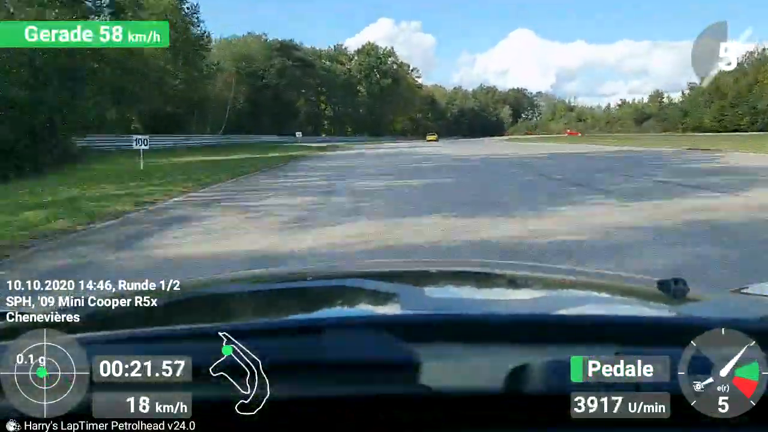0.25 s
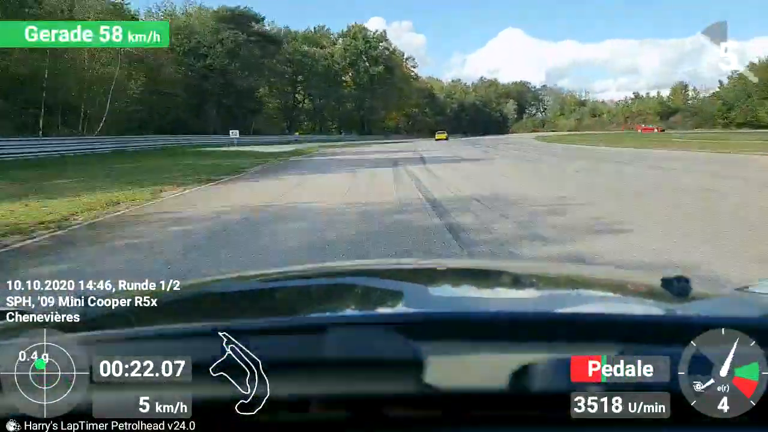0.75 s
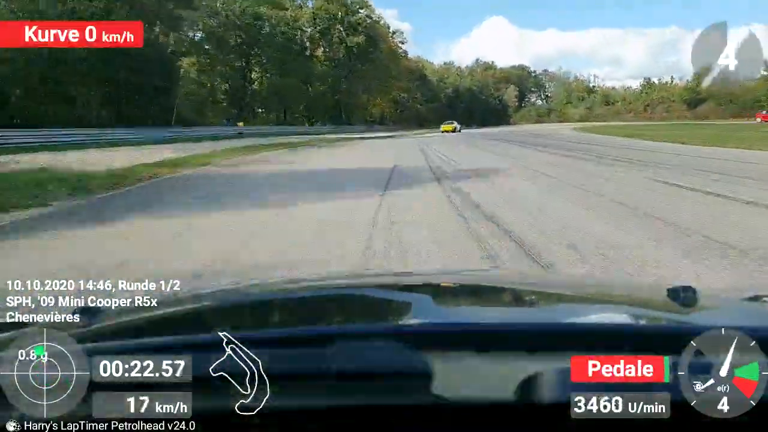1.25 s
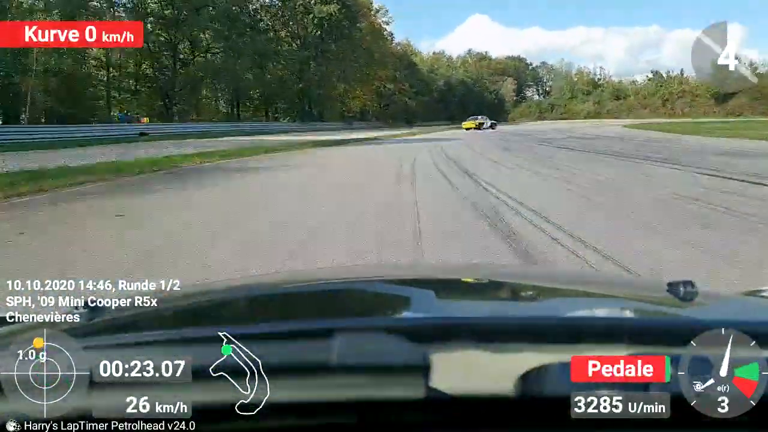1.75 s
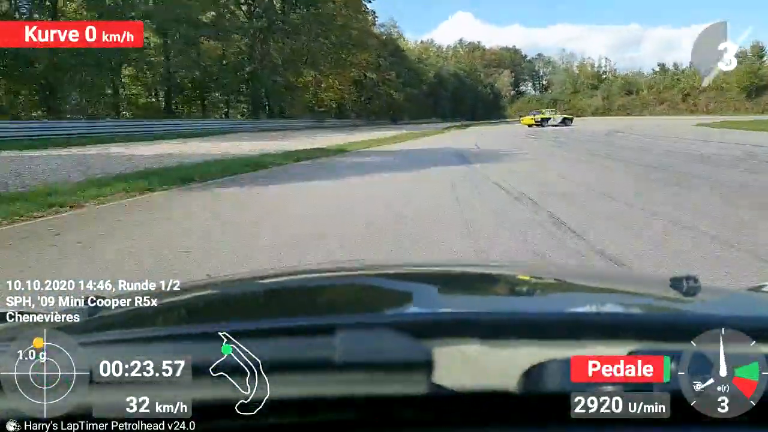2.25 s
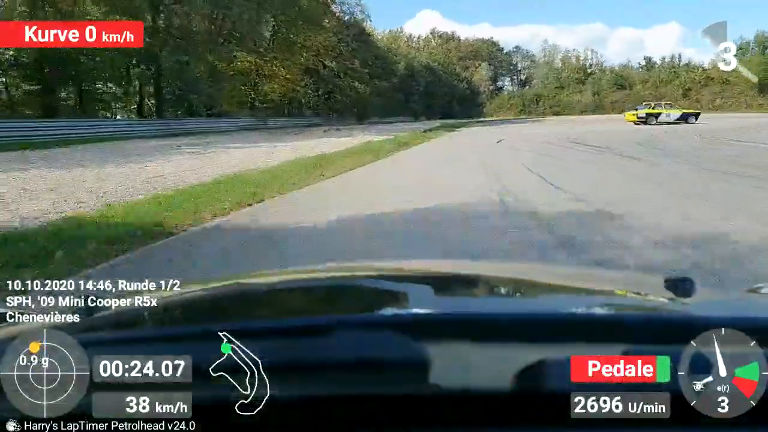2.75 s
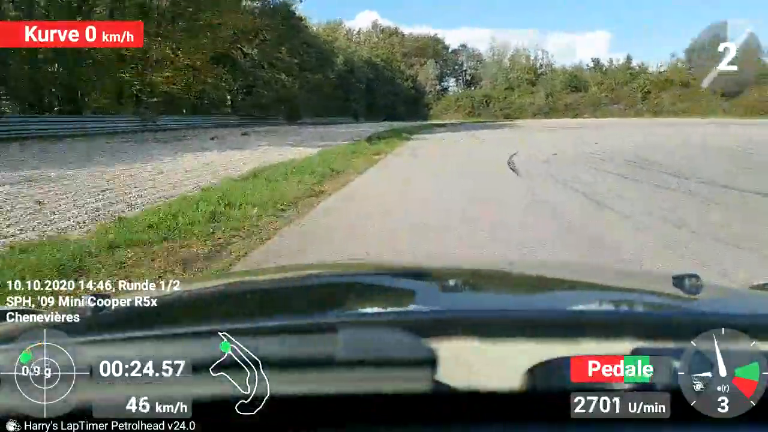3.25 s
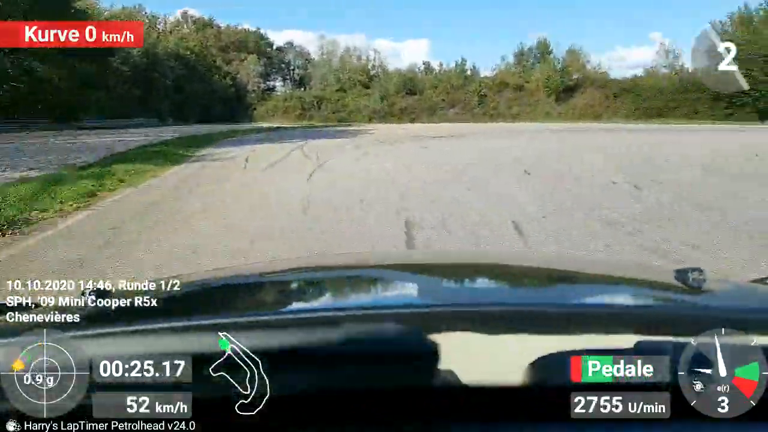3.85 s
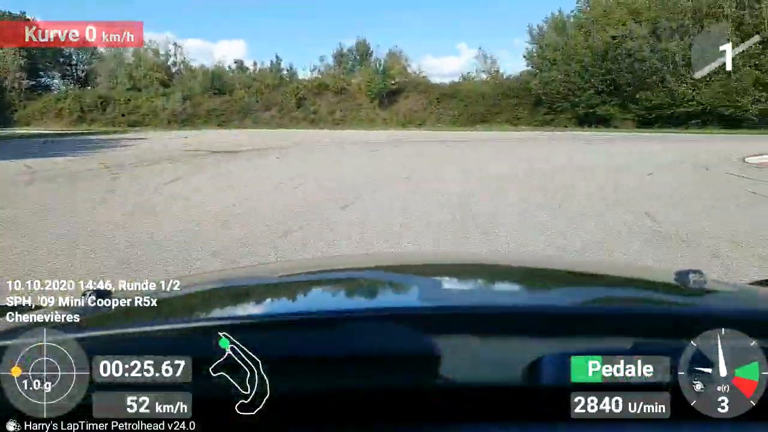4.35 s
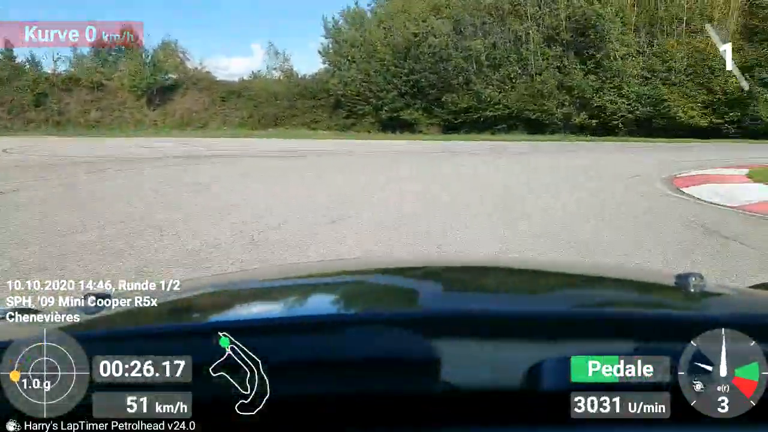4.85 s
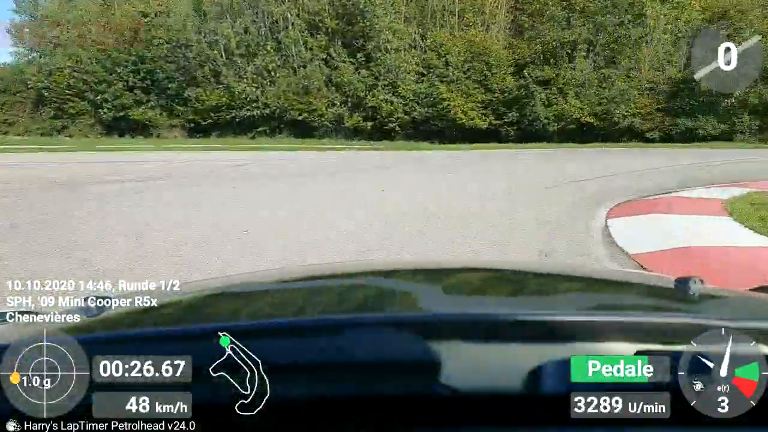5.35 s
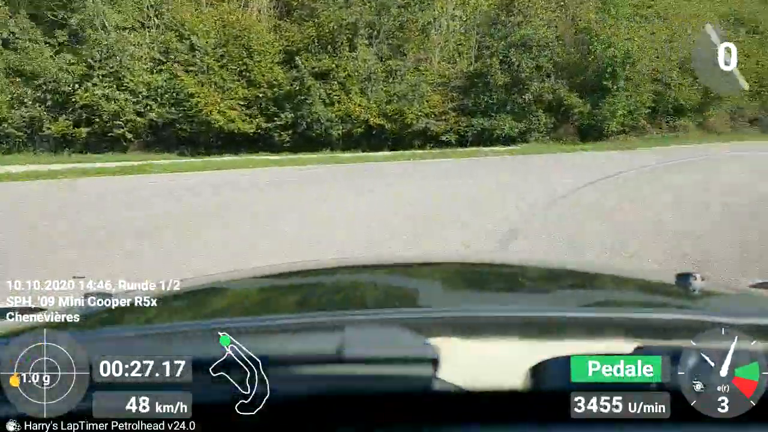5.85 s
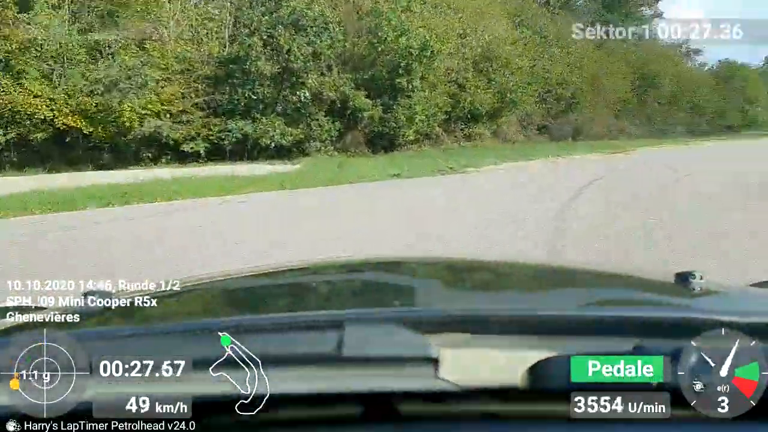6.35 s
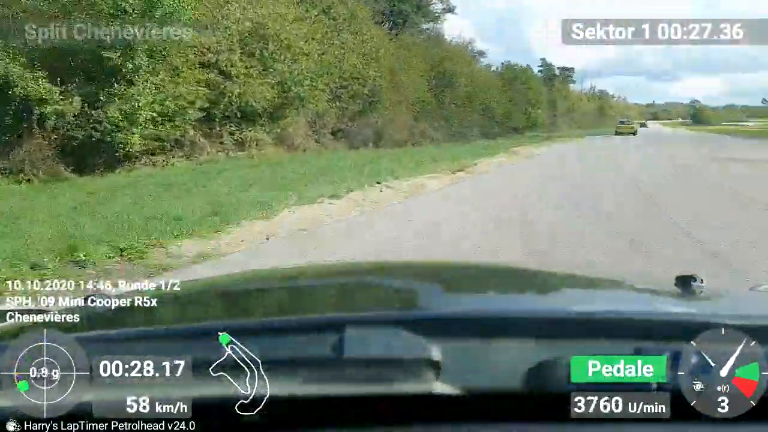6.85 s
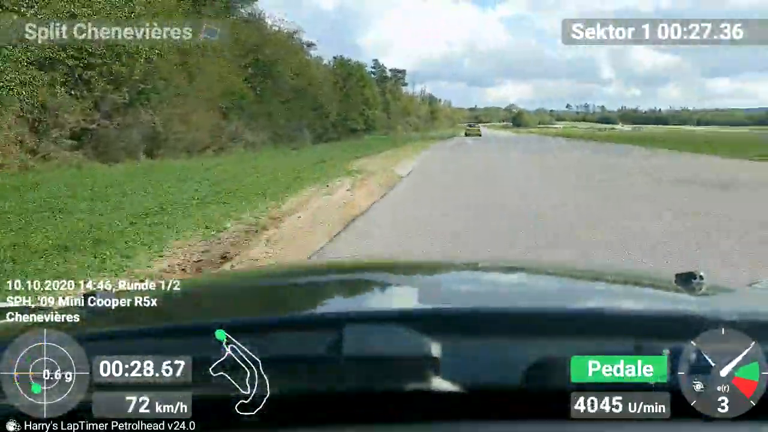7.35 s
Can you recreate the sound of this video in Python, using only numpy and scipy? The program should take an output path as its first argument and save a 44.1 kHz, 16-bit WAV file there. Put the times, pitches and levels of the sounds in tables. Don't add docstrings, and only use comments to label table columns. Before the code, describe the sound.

Heard from the windscreen inside a four-cylinder car on a circuit: a loud, buzzing full-throttle boom for almost a second, then a sudden lift. Pedals and gear lever clack close by, the engine flares briefly and falls in pitch while the floor booms under braking. Bumps thud and tyres roar through the corner at a low drone, then the engine swells and pulls away, deep and rough.

```python
import sys
import numpy as np
from scipy import signal
from scipy.fft import rfft, irfft, next_fast_len
from scipy.io import wavfile
from scipy.ndimage import uniform_filter1d, map_coordinates

SR = 44100
rng = np.random.default_rng(int(sys.argv[2]) if len(sys.argv) > 2 else 0)


def master_out(mix):
    frames = np.transpose(np.atleast_2d(mix))
    ceiling = np.clip(frames, -1, 1)
    pcm = np.round(ceiling * 32767).astype(np.int16)
    wavfile.write(sys.argv[1], SR, pcm)


def volts_from_db(level):
    exponent = np.asarray(level, float) / 20
    return 10 ** exponent


N = 335160

# (time [s], firing tone [dB], throttle [0-1])
EFFORT = [(0, -9.5, 0.97), (.8, -8.5, 0.97), (.9, -25.5, 0.62), (1.85, -24.5, 0.54), (1.97, -16.5, 0),
          (2.45, -10.5, .05), (3.2, -12, 0), (3.6, -11.5, 0.2), (4.12, -19.5, 0.08), (4.22, -17.5, 0.66),
          (4.42, -15, 0.67), (4.52, -9, 0.98), (4.66, -11.5, 0.7), (4.75, -21.5, 0.48), (5.2, -21, 0.44),
          (5.3, -16.5, 0.6), (5.8, -10, 0.97), (7.6, -8.5, 1)]
# (frequency [Hz], level [dB])
EXHAUST = [(185, -13.5), (290, -21.5), (320, -25), (355, -24), (400, -30), (530, -49.5), (700, -44),
           (950, -73.5)]
# (firing rate [Hz], level [dB])
LOPE = [(90, -18), (99, -27), (109, -16.5), (117, -10.5), (160, -5)]
# (frequency [Hz], level [dB])
CABIN = [(50, -25.5), (120, -22.5), (200, -25), (245, -33.5), (280, -22), (340, -39.5), (400, -25),
         (440, -30), (500, -44), (560, -27.5), (610, -39.5), (680, -45), (800, -58.5), (1100, -70)]
# (multiple of the firing rate, level over the quarter orders [dB])
UPPER_MULTIPLES = [(5, 8.5), (7, 8.5)]


def engine():
    speed_change, jolt_db = lurches()
    hz = firing_rate() * (1 + speed_change)
    tone_db, throttle = curves(EFFORT)
    throttle = np.clip(throttle, 0, 1)

    def multiple_db(k):
        shut_db = -14.5 - 6.5 * k
        return shut_db * (1 - throttle) + 0.98 * throttle * jolt_db + along(EXHAUST, k * hz)

    lope_shut_db = -32
    lope_open = throttle ** 3.7
    lope_db = lope_shut_db + lope_open * (along(LOPE, hz) - lope_shut_db)
    phase = 2 * np.pi * np.cumsum(hz * (1 + .002 * wobble(25))) / SR
    slip = np.clip(hz - 100, -10, 20)
    # (multiple, level [dB], lag [rad], unsteadiness [dB])
    lines = [(1, tone_db + jolt_db, 0, .6),
             (2, multiple_db(2), -.06 * slip, 1),
             (3, multiple_db(3), -2.3 - .05 * slip, 1.3),
             (4, multiple_db(4), 0.58, 2.1),
             (6, multiple_db(6), 2.7, .7)]
    for k, over_db in UPPER_MULTIPLES:
        lines.append((k, lope_db + over_db + along(CABIN, k * hz), k, 1.1))
    for k in range(2, 24):
        if k % 4:
            lines.append((k / 4, lope_db + along(CABIN, k / 4 * hz), k * k, 1.5))
    out = np.zeros((2, N))
    for k, level_db, lag, shake_db in lines:
        across = np.minimum(1.7 * (k * hz / 580) ** 3, 1.3) * np.array([[.5], [-.5]])
        drift = .05 * k * wobble(4)
        level = np.sqrt(2) * volts_from_db(level_db + shake_db * wobble(30))
        out -= level * np.cos(k * phase - lag - across + drift)
    return out


# (time [s], firing rate [Hz])
SPEED = [(0, 159), (.7, 160.5), (1.2, 149.3), (1.36, 166), (1.64, 147.5), (1.87, 125.2), (2.5, 99.5),
         (2.92, 124.2), (3.37, 89.62), (4.1, 88.48), (4.3, 92.26), (5.08, 86.7), (5.7, 92.14), (6.2, 97.26),
         (6.61, 99.5), (7.0, 117), (7.35, 116.4), (7.6, 124)]


def firing_rate():
    flywheel_s = .05
    return uniform_filter1d(curves(SPEED)[0], size=round(flywheel_s * SR), mode="nearest")


# (time [s], speed change [%], tone change [dB], length [s])
LURCHES = [(0.722, -0.58, 1.5, 0.054), (0.974, 0.32, 11.5, 0.026), (1.05, -0.35, -13, .025),
           (1.113, -0.01, 8.5, .035), (1.241, 0.01, -26, 0.022), (1.334, -0.12, 6, .03),
           (1.421, 0.5, -1, .03), (1.56, 0.01, 8, .07), (2.99, 0.22, -1.5, .08), (3.145, -0.18, 1.8, .06),
           (3.393, 0.09, -4, .08), (3.6, 5, 0, .09), (3.744, -1.17, -8.5, .03), (3.832, 0.84, 3.5, 0.056),
           (4.146, 1, -3.5, .025), (4.984, -0.1, 4.5, .06), (5.158, -0.81, -4.5, 0.072),
           (5.411, 0.25, -1.5, 0.034), (5.525, -0.43, -4.5, .025), (5.63, 0.48, -1.5, 0.029),
           (5.734, -0.56, -3.5, 0.022), (5.828, 6.5, 1.9, .05), (5.927, -0.02, -0.5, 0.018),
           (5.952, 5, 3.5, 0.02), (6.04, -5.5, -3.1, .035), (6.139, 1.26, .9, .03),
           (6.651, -0.93, -3.5, .17), (6.83, 4, -1.5, 0.038), (6.898, -3.5, -2, .04)]


def lurches():
    s, percent, db, length = np.transpose(LURCHES)
    return swells(s, percent / 100, length), swells(s, db, length)


# (time [s], peak [dB], mid
# clack [dB], low knock [dB], ping [Hz])
CLUNKS = [(0.0932, -42, -8, -1, 1210), (0.217, -44.5, -7.5, -1, 1100), (0.2729, -55, 0, 0.5, 1010),
          (0.335, -54.5, 14, 1, 1120), (0.383, -56.5, 10, 3, 1040), (0.6049, -51.5, 8, 7, 1120),
          (0.9312, -50, 7, 13, 1080), (0.964, -30.5, 10.5, -10.5, 1150), (1.0235, -49, -6, 2, 1600),
          (1.091, -36.5, -1.5, 9, 1300), (1.1474, -37, 3.5, -3, 1270), (1.1957, -44, 13, -0.5, 1150),
          (1.282, -30.5, 11.5, 7.5, 2117),
    (1.3745, -43, 0.5, 4, 3400),
    (2.0974, -36.5, -13.5, -3.5, 5500),
    (3.617, -46, 7, -6.5, 4290),
    (3.914, -51, -2.5, 6, 2370),
    (4.409, -49, -4, 4, 2280),
    (5.2088, -45.5, 11, -8.5, 3480),
    (5.5511, -52, -4, 2, 2176),
    (5.7684, -53, 9, 10.5, 1960),
    (5.84, -48.5, 5.5, -4, 2050),
]
# (frequency [Hz], level [dB per Hz])
TICK = [(1470, -31.5), (2500, -3.5), (3100, -7), (6840, -12), (7500, -18), (8540, -14), (15700, -16.5)]
# (frequency [Hz], level [dB per Hz])
CLACK = [(470, -35), (800, -3.5), (1110, -2), (1960, -10.5), (2150, -3.5), (2420, -12.5), (3480, -7.5),
         (4060, -14.5), (7000, -26.5), (9100, -54), (15400, -120)]
# (frequency [Hz], width [Hz])
KNOCK = (570, 150)


def clunks():
    tick = rush(colour(TICK), patchy_db=3.0)
    clack = rush(colour(CLACK), patchy_db=0.9)
    knock = rush(hollow(*KNOCK), patchy_db=1.5)
    out, t = np.zeros((2, N)), np.arange(SR // 4) / SR
    contacts = CLUNKS
    chance = rng.uniform(0, 2 * np.pi, (len(contacts), 2))
    for (s, db, clack_db, knock_db, ping_hz), phase in zip(contacts, chance):
        at = round(s * SR) - 90
        pan_db = -4 if db > -44.5 else 0.5
        cluster = 0
        for k in (.93, 1, 1, 1.09):
            cluster = cluster + np.sin(2 * np.pi * ping_hz * k * t + k * 9 * phase[0] + .2 * phase[:, None])
        ping = volts_from_db(-3 - .4 * clack_db - 60 * t / .06) * cluster
        thump = np.sin(2 * np.pi * 520 * t + 0.57 * phase[:, None])
        thump = volts_from_db(knock_db + 3.5 - 60 * t / 0.065) * thump
        hit = volts_from_db(clack_db) * (1 - np.exp(-t / .005)) * (ping + thump)
        # (noise, level [dB], rise [s], time to fall 60 dB [s])
        parts = [(tick, 0, .0009, .04), (clack, clack_db, .007, .13), (knock, clack_db + knock_db, .005, .12)]
        for noise, rel_db, rise, t60 in parts:
            shape = (1 - np.exp(-t / rise)) * volts_from_db(-250 * t - 60 * np.maximum(t - .018, 0) / t60)
            grain = noise[:, at:at + len(t)] / np.std(noise[:, at:at + SR // 40])
            hit = hit + volts_from_db(rel_db) * shape * grain
        out[:, at:at + len(t)] += volts_from_db(db - 3.0 + pan_db * np.array([[.5], [-.5]])) * hit
    return out


def road():
    bump_db, boom_db, hiss_db = bumps(), braking(), air()
    judder_db = judder()
    body = thud(bump_db) + rumble(bump_db, boom_db) + boom(boom_db)
    return body + roar(hiss_db, judder_db) + hiss(hiss_db, judder_db)


SMOOTH_DB = -32.5
# (time [s], thud [dB], length [s])
BUMPS = [(0.123, -31, .1), (0.676, -34.5, 0.029), (0.964, -21, .05), (1.144, -15.5, 0.062),
         (1.417, -23, 0.15), (1.694, -21.5, 0.048), (1.98, -31, .17), (2.262, -22, 0.15),
         (2.467, -24.5, .1), (2.693, -17.5, .05), (2.906, -27.5, 0.092), (3.19, -19, .1), (3.468, -20, .07),
         (3.8, -25.5, 0.25), (4.028, -29, 0.16), (4.461, -20, 0.14), (4.63, -24, 0.12), (5.003, -16, 0.051),
         (5.304, -20, .08), (5.625, -20.5, 0.19), (5.885, -16.5, .09), (6.476, -26, 0.11),
         (6.734, -23, 0.046), (6.91, -20, .06), (7.286, -23, 0.066), (7.516, -27, 0.11)]


def bumps():
    s, db, length = np.transpose(BUMPS)
    return 20 * np.log10(volts_from_db(SMOOTH_DB) + swells(s, volts_from_db(db), length))


# (frequency [Hz], level [dB per Hz])
THUD = [(12, -49.5), (25, -28.5), (40, -16), (52, -14), (66, -2), (78, -9.5), (110, -24.5), (220, -120)]


def thud(bump_db):
    sway = rush(colour(THUD), patchy_db=0.0)
    sway = sway / (.15 + np.abs(uniform_filter1d(sway[0] ** 2, size=3000))) ** .4
    return volts_from_db(bump_db - 3.5) * unit(sway)


# (frequency [Hz], level [dB per Hz])
RUMBLE = [(35, -39), (70, -11.5), (110, -5), (150, -7.5), (200, -12.5), (290, -11), (380, -30.5),
          (470, -26.5), (560, -31.5), (800, -37), (1100, -63.5), (1800, -120)]


def rumble(bump_db, boom_db):
    level_db = -28.5 + 0.23 * (bump_db - SMOOTH_DB) + .25 * (boom_db - boom_db.min())
    return volts_from_db(level_db + 0.16 * wobble(14)) * rush(colour(RUMBLE), patchy_db=1.67)


# (time [s], boom [dB])
BRAKING = [(0, -34.5), (.88, -34.5), (.98, -17.5), (1.3, -25.5), (2.45, -20), (2.6, -22), (3.1, -19.5),
           (3.3, -21.5), (3.6, -32.5), (7.6, -32)]


def braking():
    return curves(BRAKING)[0]


# (frequency [Hz], width [Hz])
FLOOR_PAN = (163, 30)


def boom(boom_db):
    floor_pan = lambda f: hollow(*FLOOR_PAN)(f) + 0.28 * hollow(118, 40)(f) + 0.27 * hollow(200, 50)(f)
    return volts_from_db(boom_db + 0.52 * wobble(22)) * rush(floor_pan, patchy_db=-1.95)


# (time [s], level over the roar [dB], length [s])
JUDDER = [
    (1.716, 5, 0.04),
    (1.924, 5.5, 0.032),
    (2.118, 6, 0.036),
    (2.548, 8.002, 0.066),
    (2.717, 7, 0.04),
]


def judder():
    return swells(*np.transpose(JUDDER))


# (frequency [Hz], level [dB per Hz])
ROAR = [(210, -24.5), (350, 0), (388, -5.5), (445, -3.5), (493, -10.5), (769, -16), (1170, -23.5),
        (1280, -22.5), (2000, -33), (2600, -63.5), (4400, -120)]


def roar(hiss_db, judder_db):
    level_db = -36 + 3.5 * np.log2(firing_rate() / 100)
    level_db = level_db + 0.43 * (hiss_db - hiss_db.mean())
    return volts_from_db(level_db + judder_db + 0.13 * wobble(12)) * rush(colour(ROAR), patchy_db=1.5)


# (time [s], hiss [dB])
AIR = [(0, -55), (.12, -53.5), (.78, -55), (.97, -53), (1.3, -52.5), (1.62, -57.5), (1.9, -56.5),
       (2.3, -53.5), (3.5, -53), (4.45, -52), (5.7, -52.5), (6.0, -56), (7.5, -55.5), (7.6, -60)]


def air():
    return curves(AIR)[0]


# (frequency [Hz], level [dB per Hz])
HISS = [(820, -25.5), (1400, 0.5), (1600, -10), (2000, -3), (2250, -2.5), (2670, -3), (3000, -7.5),
        (3500, -8), (4000, -9), (5210, -15), (6700, -19), (7600, -24.5), (11000, -25.5), (15600, -31)]
PANELS = [3370, 5760, 6600, 8500, 9600, 12300]


def hiss(hiss_db, judder_db):
    airy = lambda f: colour(HISS)(f) * (1 + .8 * sum(hollow(hz, 500)(f) for hz in PANELS))
    level_db = hiss_db + 3.0 + 0.4 * judder_db + 0.42 * wobble(12)
    return volts_from_db(level_db) * rush(airy, patchy_db=0.4)


# (frequency [Hz], left-right likeness [-1 to 1])
ALIKE = [(30, 0.97), (100, 0.96), (160, 0.89), (270, 0.85), (450, 0.73), (740, -0.22), (1200, -0.056),
         (4000, -0.016), (12000, -0.032)]
# (frequency [Hz], left over right [dB])
LEAN = [(240, 0), (480, 0.5), (950, -0.5), (1890, -0.5), (3770, 2.5), (7520, 3.5), (15000, -3)]


def rush(gain, patchy_db):
    z = signal.stft(rng.standard_normal((2, N + 512)), nperseg=512)[2]
    field = uniform_filter1d(rng.standard_normal(z.shape[1:]), size=5, axis=0)
    field = uniform_filter1d(field, size=10, axis=1)
    pair = signal.istft(z * volts_from_db(patchy_db * unit(field)), nperseg=512)[1][:, :N]
    turn = lambda hz: np.arccos(np.clip(along(ALIKE, hz), -1, 1)) / 2
    mid, side = filtered(pair, lambda hz: [np.cos(turn(hz)), np.sin(turn(hz))])
    lean = lambda hz: volts_from_db(along(LEAN, hz) * [[.5], [-.5]])
    return unit(filtered([mid + side, mid - side], lambda hz: gain(hz) * lean(hz)))


def colour(spectrum):
    return lambda hz: volts_from_db(along(spectrum, hz))


def hollow(hz, width):
    return lambda f: (f * width) ** 2 / ((hz * hz - f * f) ** 2 + (f * width) ** 2)


def filtered(x, response):
    m = next_fast_len(N + 8192)
    return irfft(rfft(x, m) * response(np.fft.rfftfreq(m, 1 / SR)), m)[..., :N]


def unit(x):
    return x / np.sqrt(np.mean(x ** 2) + 1e-20)


def along(points, hz):
    f, v = np.transpose(points)
    return np.interp(np.log(hz + 1), np.log(f + 1), v)


def curves(rows):
    s, *cols = np.transpose(rows)
    return [np.interp(np.arange(N) / SR, s, c) for c in cols]


def swells(times, sizes, lengths):
    t = np.arange(N) / SR
    return sum(size * np.exp(-((t - s) / length) ** 2) for s, size, length in zip(times, sizes, lengths))


def wobble(rate):
    return map_coordinates(rng.standard_normal(int(N * rate / SR) + 4), [np.arange(N) * rate / SR])


def scene():
    return engine() + clunks() + road()


def band_limit(x):
    return signal.sosfilt(signal.butter(12, 15820, fs=SR, output="sos"), x)


def record(dry):
    mix = dry / (1 + np.abs(dry / 0.93) ** 8) ** (1 / 8)
    return band_limit(mix)


dry = scene()
out = record(dry)
master_out(out)
```